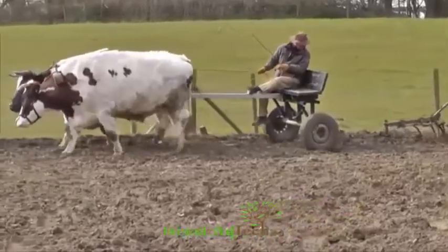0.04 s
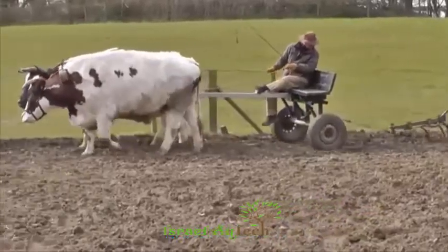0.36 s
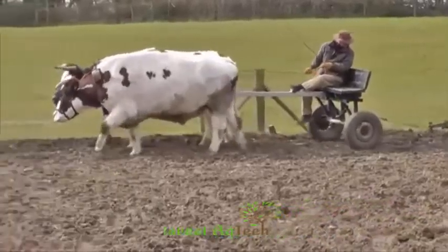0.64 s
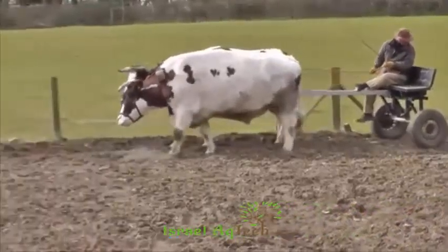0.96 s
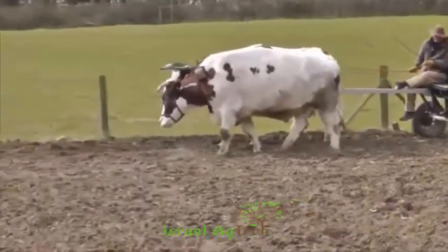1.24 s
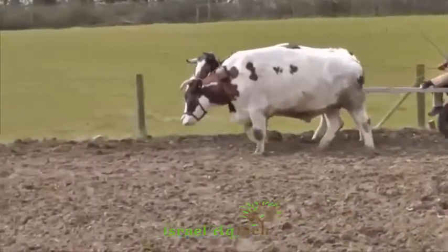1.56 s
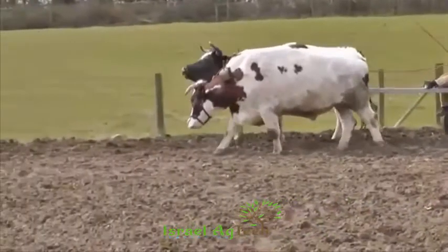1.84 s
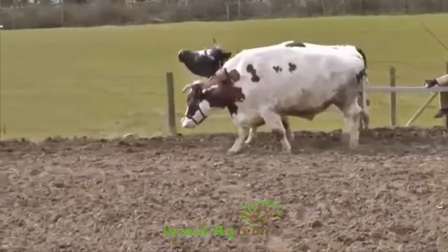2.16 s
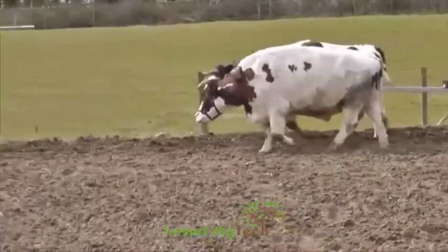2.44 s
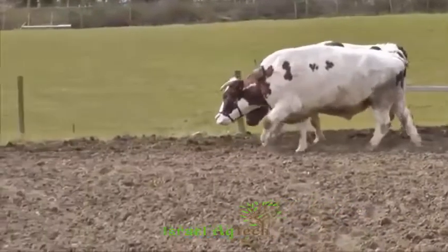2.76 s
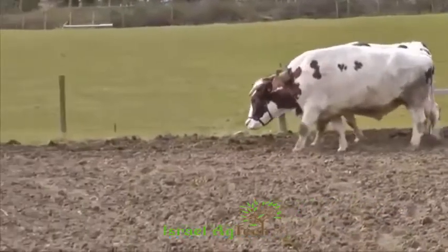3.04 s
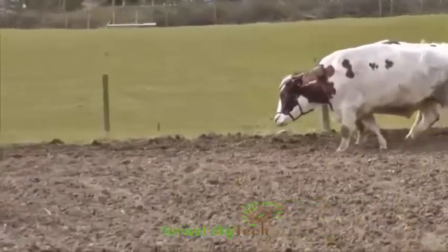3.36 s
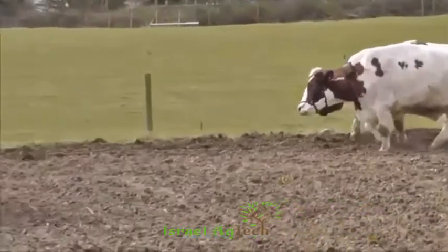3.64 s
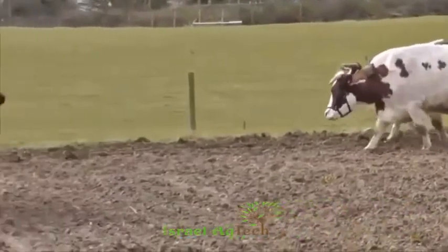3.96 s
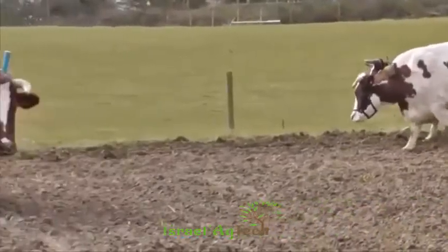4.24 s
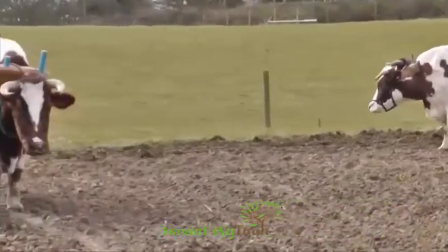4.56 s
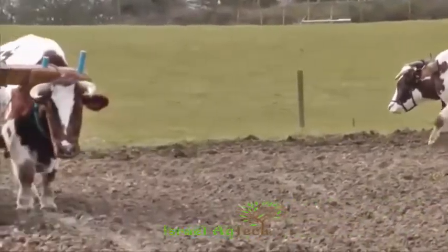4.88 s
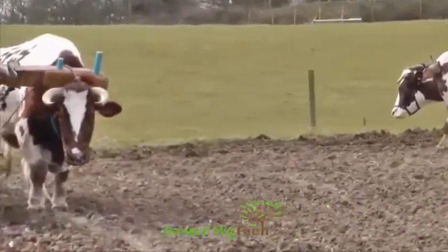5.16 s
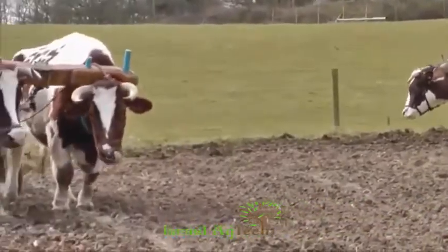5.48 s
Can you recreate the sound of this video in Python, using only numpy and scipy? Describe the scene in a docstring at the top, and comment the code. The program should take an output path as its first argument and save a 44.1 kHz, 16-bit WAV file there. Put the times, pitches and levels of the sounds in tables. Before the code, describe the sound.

Bright, irregular chain clinks and a few sharp hitch knocks come from the left of a nearby stereo microphone as a team of oxen hauls a cart across a field. Softer gritty scrapes and hissing sprays of dry earth follow their strides. The breeze is light at first, then turns halfway into loud, low gusts, mostly on the right, that slap and distort over the continuing ironwork.

```python
"""A breezy open field, close beside a yoked pair of oxen dragging a cart and harrow over loose soil.
Left of the stereo microphone the draught chain clinks and rattles with their stride, link ringing on
link, and the hitch knocks. Hooves and tines scrape the earth, crush clods and fling dry crumbs.
Halfway through, gusts start to buffet the two microphone ports, thumping, crackling and overloading them."""
import sys
import numpy as np
from scipy import signal
from scipy.fft import rfft, irfft, next_fast_len
from scipy.io import wavfile
from scipy.ndimage import uniform_filter1d

SR = 44100
rng = np.random.default_rng(int(sys.argv[2]) if len(sys.argv) > 2 else 0)


def wav_out(sig):
    """Save sig, one row per channel (or a flat mono array), as 16-bit PCM at SR to the path in sys.argv[1]."""
    wavfile.write(sys.argv[1], SR, np.round(np.clip(np.atleast_2d(sig).T, -1, 1) * 32767).astype(np.int16))


N = 243025
TIME = np.arange(N) / SR

# Levels in the tables are relative: each source adds its own gain. A t60 is the time to die by 60 dB.
# The clearest blows between links. Each row: start in seconds, level in dB, pitch in Hz,
# trims of the second and third modes in dB, t60 in seconds.
LINK_BLOWS = [(0.0498, -24, 2140, -1, -23, 0.14), (0.1281, -16, 2112, -11, -17, 0.11),
              (0.176, -18, 2126, -30, -21, 0.043), (0.2443, -15.5, 2113, -3, -19, 0.12),
              (0.363, -14.5, 2095, -9, -42, 0.045), (0.5467, -10.5, 2084, -21, -26, 0.059),
              (0.6399, -8.5, 2098, -12.5, -26, 0.12), (0.7257, -19.5, 2070, -19, -8, 0.06),
              (1.0026, -21.5, 2135, -31, -15, 0.24), (1.174, -12, 2100, -2.5, -32, 0.15),
              (1.29, -23, 2100, -8, -16, 0.077), (1.4222, -8.5, 2107, -9, -21, 0.1),
              (1.4642, -16.5, 2090, -11, -33, 0.097), (1.5783, -26, 2070, -12, -8, 0.087),
              (1.6621, -15.5, 2083, -4, -20, 0.1), (1.704, -17.5, 2095, -14, -17, 0.1),
              (1.8457, -23, 2128, -6, -9, 0.34), (2.0243, -24.5, 2130, -26, -10, 0.052),
              (2.0577, -27, 2100, -20, -20, 0.13), (2.1625, -20.5, 2090, -12, -25, 0.18),
              (2.2643, -18, 2086, -6, -18, 0.16), (2.3156, -18, 2095, 0, -33, 0.14),
              (2.363, -21, 2056, 1.5, -20, 0.069), (2.4454, -16.5, 1986, 1, -5, 0.048),
              (2.4538, -7, 2071, -36, -12.5, 0.15), (2.588, -25.5, 2090, -14, -6, 0.26),
              (2.6695, -16.5, 2090, -4.5, -23, 0.06), (2.7487, -14.5, 2080, -16, -12, 0.047),
              (2.8933, -12.5, 2115, -13, -22, 0.1), (2.9124, -12.5, 2110, -12, -30, 0.15),
              (3.0679, -15, 2090, -2, -30, 0.17), (3.1913, -7.5, 2092, -2, -23, 0.064),
              (3.2645, -19, 2083, -4, -21, 0.11), (3.3323, -23.5, 2116, -11, -12, 0.13),
              (3.4101, -15, 2085, -7, -17, 0.081), (3.484, -21, 2137, -4, -12, 0.11),
              (3.5502, -6.5, 2093, -18, -42, 0.11), (3.6195, -8.5, 2090, -10, -20, 0.13),
              (3.7739, -7.5, 2094, -2.5, -21, 0.14), (3.927, -21, 2080, -24, -20, 0.14),
              (4.0966, -20, 2126, -20, -10.5, 0.25), (4.2552, -25.5, 2110, -11, -9, 0.18),
              (4.4174, -10.5, 2097, -38, -19.5, 0.089), (4.4737, -22, 2106, -13, -16, 0.29),
              (4.5271, -19, 2133, -27, -25, 0.082), (4.6448, -23.5, 2137, -18, -29, 0.11),
              (4.7382, -16.5, 2106, -48, -17, 0.12), (4.8299, -19.5, 2116, -30, -19, 0.087),
              (4.9655, -11.5, 2090, -10, -37, 0.079), (5.156, -17.5, 2132, -31, -42, 0.21),
              (5.2599, -28, 2120, -14, -22, 0.094), (5.384, -25, 2080, 13.5, -28, 0.13),
              (5.4415, -13.5, 2104, -32, -45, 0.26), (5.4809, -9.5, 2104, -5.5, -42, 0.12)]
# High pings of the chain, some alone, some ringing with a louder clink.
# Each row: start in seconds, level in dB, pitch in Hz, t60 in seconds.
CHAIN_PINGS = [(0.1125, -25, 8690, 0.28), (0.2344, -33.5, 9420, 0.28), (0.265, -29, 4750, 0.21),
               (0.365, -28.5, 7515, 0.12), (0.548, -31, 7515, 0.093), (0.7065, -18.5, 4740, 0.1),
               (0.759, -17, 4840, 0.11), (0.796, -8, 4780, 0.033), (1.2144, -28, 4760, 0.2),
               (1.4845, -28, 8640, 0.24), (1.721, -24, 4840, 0.17), (1.735, -20, 4760, 0.11),
               (2.417, -27.5, 8570, 0.35), (2.737, -22.5, 4785, 0.4), (2.765, -21, 4800, 0.092),
               (3.57, -37, 9410, 0.35), (3.5992, -19.5, 4830, 0.18), (3.652, -26, 4830, 0.46),
               (4.419, -25, 8700, 0.062), (4.5292, -15, 4820, 0.063), (4.6735, -27, 4840, 0.057),
               (4.696, -26.5, 4830, 0.12), (4.8733, -26, 4800, 0.067), (4.8835, -20.5, 4780, 0.069),
               (5.31, -28, 10160, 0.16)]
# Knocks of the hitch iron. Each row: start in seconds, level in dB.
HITCH_KNOCKS = [(0.124, -9), (1.385, -11.5), (1.404, -6), (1.4132, 5.5), (1.4213, -4), (1.485, -13),
                (1.4936, -12.5), (1.998, -15), (2.2114, -10.5), (2.678, -9), (3.0736, -5), (4.304, -13),
                (5.309, -13.5)]
# Short shakes of the slack chain. Each row: start in seconds, level in dB.
CHAIN_SHAKES = [(0.0, -33.5), (0.119, -32.5), (0.228, -34.5), (1.211, -32), (1.649, -32), (2.11, -38),
                (2.38, -53), (2.6, -30.5), (2.86, -29), (3.76, -33.5), (4.099, -31), (4.48, -43),
                (4.96, -37), (5.199, -36.5)]
# How the iron rings. Each row: frequency in Hz, level in dB, t60 in seconds.
LINK_MODES = [(2101, 0, .16), (3940, 0, .17), (5190, 0, .15), (4770, -27, .15), (7515, -29, .2),
              (8610, -29, .22), (9410, -25, .14), (10280, -30, .12)]  # the three main modes first
SMALL_LINK_MODES = [(3945, -13, .2), (4780, -8, .2), (5340, -14, .15), (7900, -16, .2), (8740, -16, .2),
                    (9410, -8.5, .18), (10270, -10, .18)]
HITCH_MODES = [(1563, -18.5, 0.053), (1664, -8, 0.022), (1680, -13, 0.048), (4500, -27, 0.023)]

# The team's steady pull. Each row: time in seconds, chain sliding in dB, soil scraping in dB.
TEAM_PULL = [(0, -46, -33.5), (0.55, -58, -41.5), (1.1, -50, -36), (1.55, -51, -32.5), (1.85, -45, -37),
             (2.2, -51, -35.5), (2.5, -46, -35), (3.4, -42, -35), (4.0, -41.5, -31.5), (4.4, -56, -35),
             (4.9, -44, -36), (5.5, -44.5, -33.5)]
# Strides jerking the harrow on. Each row: crest in seconds, then chain, soil and clod levels in dB.
STRIDE_JERKS = [(0.788, -28, -26.5, -23.5), (1.748, -28.5, -29, -24), (2.781, -32, -27, -41),
                (3.621, -29.5, -27, -42), (4.54, -40, -44, -26), (5.331, -33.5, -43, -27)]
# Hooves scuffing the ground. Each row: start and length in seconds, then soil and clod levels in dB.
HOOF_SCUFFS = [(0.116, 0.02, -28, -27.5), (0.263, 0.031, -36, -38), (0.485, 0.11, -45, -34.5),
               (0.877, 0.015, -28.5, -52), (0.973, 0.046, -33, -40), (1.184, 0.12, -30.5, -30.5),
               (1.53, 0.063, -50, -30), (2.138, 0.018, -29, -43), (2.383, 0.054, -40, -53),
               (2.6, 0.15, -44, -32), (3.05, 0.071, -30.5, -24.5), (3.407, .04, -46, -43),
               (4.531, 0.018, -34, -35), (4.939, 0.072, -33.5, -31), (5.13, 0.13, -31.5, -52),
               (5.349, 0.12, -34.5, -27.5)]
# Crumbs flung by hooves. Each row: start and length in seconds, level in dB, attack in seconds, peak in Hz.
CRUMB_THROWS = [(0.107, 0.025, -53, .01, 7500), (0.742, 0.025, -28, .03, 6300),
                (1.67, .008, -32, .004, 6000), (1.72, 0.047, -30.5, .02, 7300),
                (1.787, 0.51, -40.5, .03, 6900), (1.9, 0.012, -31, .008, 6700),
                (2.145, 0.011, -38, .004, 6000), (2.377, 0.015, -30, .004, 6700),
                (2.603, .025, -29, .012, 6900), (2.83, 0.028, -29.5, .025, 6500),
                (3.07, 0.053, -33, 0.036, 6940), (3.316, 0.014, -29.5, .004, 7300),
                (3.773, 0.014, -29.5, .012, 7050), (4.021, .004, -29, .002, 6430),
                (4.04, 0.067, -35, .03, 7000), (4.24, 0.027, -33, .018, 7200),
                (4.484, 0.014, -28.5, .005, 7000), (4.717, 0.014, -28.5, .007, 7200),
                (4.95, 0.05, -37.5, .01, 6350), (4.945, 0.35, -37.5, .05, 3440),
                (5.173, 0.03, -32.5, .02, 6840)]
# The hiss of those crumbs. Each row: multiple of the peak frequency, spectral level in dB.
SPRAY_SPECTRUM = [(.24, -27), (.55, -20), (.82, 5), (1, 5), (1.27, 1.5), (1.67, -2)]

# The breeze on the microphone. Each row: time in seconds, level in dB, left minus right in dB.
BREEZE_CURVE = [(0, -26, -3.5), (0.7, -45, -5), (1.1, -29, -1), (1.6, -40.5, -1), (1.85, -27, -4),
                (2.3, -25, 1), (2.6, -13.5, -5.5), (2.95, -9.5, -7), (3.32, -14.5, -5.5), (3.65, -10, -5.5),
                (4.0, -7, -0.5), (4.3, -12, -2.5), (4.6, -14.5, -10), (4.87, -21, -5), (5.05, -15, -5),
                (5.5, -11.5, -15)]
# Gusts, most from the right. Each row: start and length in seconds, level in dB, left minus right in dB.
WIND_GUSTS = [(0.118, 0.041, -31, -16), (0.414, 0.13, -28.5, -6), (0.902, 0.14, -25, -24),
              (1.894, 0.084, -22, -14), (2.263, 0.036, -19, -8), (2.387, 0.03, -17, -12),
              (2.44, 0.06, -17.5, 6), (2.574, 0.076, -9, -14.5), (2.696, 0.19, -1, -26),
              (2.852, 0.023, -2.5, 7), (3.382, 0.093, -3, -9.5), (3.487, 0.036, -6.5, 17),
              (3.641, 0.28, -5.5, -6.5), (4.393, 0.12, -10.5, -6), (4.905, 0.072, -10, -14.5),
              (5.308, 0.048, -8, -4), (5.449, 0.016, -7, -12)]
# Sharp slaps of wind. Each row: start in seconds, level in dB, left minus right in dB, length in seconds.
WIND_SLAPS = [(0.997, -13, -18, 0.011), (2.708, 3, -8, 0.029), (2.773, 3.5, -20, 0.026),
              (2.827, 4.5, -36, 0.028), (3.07, -1, 17.5, 0.027), (3.43, 4, -10, 0.023),
              (3.825, 5.5, 5, 0.027), (4.964, 4.5, -1.5, 0.013), (5.255, -3.5, -14.5, 0.021),
              (5.342, -1.5, -40, 0.0046)]
# Lone eddies on the right port. Each row: centre in seconds, level in dB, pitch in Hz.
EDDY_THUMPS = [(1.001, -5.5, 304), (1.016, -12, 260), (2.267, -8, 263), (2.404, -8, 149), (3.189, 3.5, 320),
               (3.401, -2, 285), (4.229, 3.5, 168), (4.2427, 3, 583), (4.284, -1, 196), (4.34, -3, 152),
               (4.374, -1.5, 386), (4.412, 2, 195), (4.474, -2, 400), (4.624, -6, 201), (4.717, -5.5, 234),
               (4.974, 4.5, 206), (5.127, 1, 129), (5.35, -7, 466)]
# A faint low drone in the background. Each row: time in seconds, level in dB.
DRONE_CURVE = [(0, -67), (.5, -43), (.7, -26), (1.3, -36.5), (1.65, -31), (1.8, -24.5), (2.5, -25),
               (3.5, -73), (5.5, -53)]

# The colours of the noises. Each row: frequency in Hz, spectral level in dB.
CLACK_SPECTRUM = [(1000, -42), (1750, -5), (1950, 34), (2250, -5), (2500, -35), (4000, -41), (10000, -40)]  # link meeting link
FIZZ_SPECTRUM = [(1000, -27), (3300, -17), (4200, 18), (4800, 15), (5500, 15), (6400, -41), (7700, 4),
                 (9400, 13.5), (10800, 2)]  # rubbing iron
SOIL_SPECTRUM = [(150, 9), (400, -3), (700, 7.5), (1150, 0.5), (1750, 9), (2300, -2.5), (3000, -6.5),
                 (3700, 1), (4800, -3.5), (6300, -21.5), (8000, -7.5), (10500, -16.5)]  # scraped earth
CLOD_SPECTRUM = [(150, -10), (460, -6), (660, 3.5), (900, 6.5), (1250, -4.5), (1900, -2), (2800, -5.5),
                 (5000, -82)]  # lumps giving way
BUFFET_SPECTRUM = [(20, -48), (50, -1.5), (110, 4), (210, 3), (330, -1.5), (500, -12), (900, -21.5),
                   (1800, -34), (4000, -95), (9000, -87)]  # a strong gust on a port
SLAP_SPECTRUM = [(40, -89), (150, 9.5), (350, 2), (700, -4), (1500, -38), (3000, -36), (9000, -82)]  # one fast eddy bursting
CRACKLE_SPECTRUM = [(200, 8), (450, 1.5), (800, -2), (1400, -12.5), (2600, -30)]  # small eddies breaking
FIELD_SPECTRUM = [(20, -26), (50, -5), (100, 5), (240, 10.5), (420, 9), (680, 1), (1200, -16), (1750, 6),
                  (2200, -8), (2900, -71), (4300, -26), (6300, -64), (10500, -43)]  # open country


def clinks(level_db=1.0, neighbour_db=-9.0, clack_db=-12.5, bounce_db=-16.5, rise_s=0.0025, clack_s=0.0089):
    """Each blow clacks, rings a link and its damped neighbour, and passes to the next link a moment later."""
    out, t = np.zeros((2, N)), np.arange(SR // 5) / SR
    chances, strikes = rng.random((128, 4)), rng.standard_normal((128, 2, len(LINK_MODES) - 1))
    for (s, db, pitch, second_db, third_db, t60), chance, strike in zip(LINK_BLOWS, chances, strikes):
        neighbour_tune, delay, bounce_tune, graze = chance
        spot, detunes = strike
        contact_s = rise_s * gain_of(-db / 10)  # light, glancing blows build up more slowly
        link = ring(pitch, t60, left_db=11, rise_s=contact_s)
        neighbour = ring(pitch * (.98 + .025 * neighbour_tune), t60=0.023, left_db=11, rise_s=contact_s)
        blow = (link + gain_of(neighbour_db) * neighbour) * chatter(depth=.5 * graze)
        clack = coloured(rng.standard_normal(len(t)), CLACK_SPECTRUM)
        clack *= np.exp(-t / clack_s) * (1 - np.exp(-t / rise_s))
        blow += gain_of(clack_db) * clack * pan(left_db=9)
        # where the link is struck decides how strongly each overtone speaks
        struck_db = np.r_[second_db - 7, third_db + 1.5, 5 * spot[2:] - 6.5]
        for (hz, mode_db, mode_t60), extra_db, detune in zip(LINK_MODES[1:], struck_db, detunes):
            overtone = ring(hz * (1 + 0.0027 * detune), mode_t60, left_db=6, rise_s=0.0074)
            blow += gain_of(mode_db + extra_db) * overtone
        add(out, s, gain_of(db + level_db) * blow)
        bounce = ring(pitch * (.99 + .02 * bounce_tune), t60=.12, left_db=10, rise_s=.002)
        add(out, s + .012 + 0.046 * delay, gain_of(db + bounce_db) * bounce)
    return out


def pings(level_db=-2.0, twin_db=-21.5):
    """One high mode of a link rings, alone or with a louder clink, and briefly that of the link it meets."""
    out = np.zeros((2, N))
    for (s, db, hz, t60), detune in zip(CHAIN_PINGS, rng.uniform(-.025, .025, 64)):
        link = ring(hz, t60, left_db=9.5, rise_s=0.003)
        twin = gain_of(twin_db) * ring(hz * (1 + detune), t60=0.06, left_db=-1, rise_s=0.001)
        add(out, s, gain_of(db + level_db) * chatter(depth=.55) * (link + twin))
    return out


def clanks(level_db=2.0, crack_db=-24.0, crack_s=0.014):
    """Well to the left, the hitch takes up its slack in knocks, each a crack and a short ring."""
    out, t = np.zeros((2, N)), np.arange(SR // 5) / SR
    body = sum(gain_of(db) * ring(hz, t60, left_db=21, rise_s=0.0024) for hz, db, t60 in HITCH_MODES)
    for s, db in HITCH_KNOCKS:
        crack = coloured(rng.standard_normal((2, len(t))), SOIL_SPECTRUM) * np.exp(-t / crack_s)
        add(out, s, gain_of(db + level_db) * (body + gain_of(crack_db) * crack * pan(left_db=6)))
    return out


def rattle(slide, links_db=-2.0, fizz_db=1.0):
    """The sliding chain rubs with a fine fizz, and ticks against itself and the hitch."""
    jingle = jostle(SMALL_LINK_MODES, slide, per_s=70, left_db=5, apart=.009)
    links = jostle(LINK_MODES[:1], slide, per_s=40, left_db=10, apart=.02)
    hitch = jostle(HITCH_MODES[:3], slide, per_s=30, left_db=11, apart=.02)
    friction = stereo_grains(per_s=4100, spread_db=-4.5, shared=0.16)
    fizz = patchy(coloured(friction, FIZZ_SPECTRUM), depth_db=6)
    return jingle + gain_of(links_db) * links + hitch + gain_of(fizz_db) * slide * fizz


def jostle(modes, slide, per_s, left_db, apart, t60_scale=0.57):
    """Many small random blows ring the modes of three nearly equal parts, which damp each other."""
    out = np.zeros((2, N))
    for hz, db, t60 in modes:
        for detune in (-apart, 0, apart):
            mode = ring(hz * (1 + detune), t60 * t60_scale, left_db, rise_s=0.00083)
            mode /= np.linalg.norm(mode[0])
            blows = evened(grains(per_s, spread_db=5)) * slide
            out += gain_of(db) * signal.oaconvolve(blows[None], mode, axes=1)[:, :N]
    return out


def ring(hz, t60, left_db, rise_s):
    """One dying mode of iron as both ports hear it; it reaches the right one first."""
    t = np.arange(SR // 5) / SR
    envelope = gain_of(-60 * t / t60) * (1 - np.exp(-t / rise_s))
    phase = 2 * np.pi * hz * t
    return envelope * np.array([np.sin(phase - .8), np.sin(phase)]) * pan(left_db)


def chatter(depth):
    """The quick, uneven flutter of a ringing link that grazes its neighbour."""
    return 1 + depth * evened(uniform_filter1d(rng.standard_normal(SR // 5), size=130))


def efforts(flutter_db=-5.0, wheels_db=-45.5, build_s=0.064, slack_s=0.036):
    """How hard chain, soil and clods are worked: pull, strides, hooves and shakes add up as powers."""
    chain, soil = gain_of(follow(TEAM_PULL)) ** 2
    chain *= gain_of(flutter_db * wander(rate_hz=3.7)) ** 2
    lumps = np.full(N, gain_of(wheels_db) ** 2)  # the wheels crumble clods all the time
    for s, chain_db, soil_db, clods_db in STRIDE_JERKS:
        jerk = np.exp(-np.maximum((s - TIME) / build_s, (TIME - s) / slack_s))
        chain += (gain_of(chain_db) * jerk) ** 2
        soil += (gain_of(soil_db) * jerk) ** 2
        lumps += (gain_of(clods_db) * jerk) ** 2
    for s, length, soil_db, clods_db in HOOF_SCUFFS:
        scuff = swell(s, length, attack_s=0.01, release_s=0.013)
        soil += (gain_of(soil_db) * scuff) ** 2
        lumps += (gain_of(clods_db) * scuff) ** 2
    for s, db in CHAIN_SHAKES:
        chain += (gain_of(db) * swell(s, length_s=0.0042, attack_s=0.0013, release_s=0.027)) ** 2
    return np.sqrt([chain, soil, lumps])


def scrape(rub, level_db=5.5, flutter_db=2.5):
    """Fine soil rubs under hooves and tines, a little left of centre."""
    level = gain_of(level_db + flutter_db * wander(rate_hz=10.4))
    grit = coloured(stereo_grains(per_s=2600, spread_db=1.5, shared=0.53), SOIL_SPECTRUM)
    return patchy(grit, depth_db=9) * rub * level * pan(left_db=3)


def sprays(flutter_db=-1.5):
    """Dry crumbs thrown up by the hooves patter down unevenly; the finer they are, the brighter they hiss."""
    out = np.zeros((2, N))
    patter = stereo_grains(per_s=8000, spread_db=-2.5, shared=0.49)
    patter *= gain_of(flutter_db * wander(rate_hz=46))
    for s, length, db, attack_s, peak_hz in CRUMB_THROWS:
        part = slice(round(s * SR), round((s + length + .25) * SR))
        spectrum = [(peak_hz * multiple, band_db) for multiple, band_db in SPRAY_SPECTRUM]
        hiss = coloured(patter[:, part], spectrum)
        release_s = 0.03 * (length / .02) ** 0.15  # a longer throw settles more slowly
        out[:, part] += gain_of(db) * hiss * swell(s, length, attack_s, release_s)[part]
    return out * pan(left_db=-1)


def clods(crush, level_db=-1.0):
    """Larger lumps of earth give way with duller, coarser knocks."""
    crunch = coloured(stereo_grains(per_s=600, spread_db=0, shared=0.77), CLOD_SPECTRUM)
    return patchy(crunch, depth_db=4.5) * crush * gain_of(level_db) * pan(left_db=-1.5)


def wind(level_db=-0.92, brighten_per_db=0.014, lumps_db=3.0, pop_gain=0.76):
    """Eddies hit each microphone port separately; faster air makes smaller eddies and a higher rumble."""
    strength = airflow()
    air = rng.standard_normal((2, N))  # smooth turbulence, then single pops of pressure
    air += pop_gain * np.array([evened(grains(per_s=74, spread_db=6)) for side in range(2)])
    hz, frame_s, spectra = signal.stft(air, SR, nperseg=1024)
    strength_db = 20 * np.log10([np.interp(frame_s, TIME, port) for port in strength])
    pitch = np.exp(brighten_per_db * (strength_db + 14))
    pitch *= [[1.32], [0.87]]  # the sheltered left port gets smaller eddies
    shape = gain_of(level_at(BUFFET_SPECTRUM, hz[None, :, None] / pitch[:, None]))
    shape /= np.linalg.norm(shape, axis=1, keepdims=True)
    eddies = evened(signal.istft(spectra * shape, nperseg=1024)[1][:, :N])
    # the gust sets the force, the eddies only add quick lumps
    eddies /= np.sqrt(uniform_filter1d(eddies ** 2, size=2500, axis=1) + 1e-6)
    lumps = gain_of(lumps_db * np.array([wander(rate_hz=24.4), wander(rate_hz=26)]))
    return gain_of(level_db) * strength * eddies * lumps + crackle(strength)


def airflow(unsteady_db=-0.96):
    """Force of the air on each port: an unsteady breeze that freshens halfway, with gusts on top."""
    def port_powers(db, left_db):
        """Splits a power between the two ports."""
        sides = gain_of([left_db, -left_db]).reshape(2, -1)
        return gain_of(db) ** 2 * sides / sides.mean(0)
    unsteady = gain_of(unsteady_db * np.array([wander(rate_hz=6.3) for side in range(2)]))
    power = port_powers(*follow(BREEZE_CURVE)) * unsteady ** 2
    for s, length, db, left_db in WIND_GUSTS:
        power += port_powers(db, left_db) * swell(s, length, attack_s=0.016, release_s=0.019) ** 2
    return np.sqrt(power)


def crackle(strength, level_db=-15.0, left_db=6.0, growth=1.79):
    """Small eddies break on each port in coarse pops, growing faster than the gust, up to a ceiling."""
    pops = coloured(np.array([grains(per_s=98, spread_db=1.5) for side in range(2)]), CRACKLE_SPECTRUM)
    return pops * np.minimum(strength, .5) ** growth * gain_of([[level_db + left_db], [level_db]])


def slaps(level_db=-9.5):
    """Now and then one fast eddy bursts right on the microphone."""
    out, t = np.zeros((2, N)), np.arange(SR // 8) / SR
    for s, db, left_db, length in WIND_SLAPS:
        age = 3 * t / length  # the burst crests a third of the way in
        burst = coloured(rng.standard_normal((2, len(t))), SLAP_SPECTRUM) * age * np.exp(1 - age)
        add(out, s, gain_of(db + level_db) * burst * pan(left_db))
    return out


def thumps(width_cycles=0.58):
    """A lone eddy swings the pressure on the windward right port once, with a dull thump."""
    out, t = np.zeros((2, N)), np.arange(-SR // 50, SR // 50) / SR
    for (s, db, hz), phase in zip(EDDY_THUMPS, rng.uniform(0, 2 * np.pi, 64)):
        swing = np.cos(2 * np.pi * hz * t + phase) * np.exp(-(hz * t / width_cycles) ** 2 / 2)
        add(out, s + t[0], gain_of(db) * np.outer([0, 1], swing))
    return out


def scatter(x, wet_db=-13.0, t60=.22, echoes_per_s=2000):
    """Rough ground and the cart nearby throw back a short, thin tail behind the direct sound."""
    t = np.arange(SR // 2) / SR
    taps = rng.standard_normal((2, len(t))) * (rng.random((2, len(t))) < echoes_per_s / SR)
    taps *= (t > .004) * gain_of(-60 * t / t60)
    taps /= np.linalg.norm(taps, axis=1, keepdims=True)
    return x + gain_of(wet_db) * signal.oaconvolve(x.mean(0)[None], taps, axes=1)[:, :N]


def field(wash_db=-34.5, drone_db=-7.5, drone_hz=49.5):
    """Behind it all lies the steady wash of open country, with a low wavering drone."""
    air = rng.standard_normal((2, N)) + 0.86 * rng.standard_normal(N)  # partly common to both ports
    phase = 2 * np.pi * np.cumsum(drone_hz * (1 + 0.035 * wander(rate_hz=1.3))) / SR
    drone = evened(np.sin(phase) + 0.32 * np.sin(2 * phase)) * gain_of(follow(DRONE_CURVE)[0] + drone_db)
    return gain_of(wash_db) * coloured(air, FIELD_SPECTRUM) + drone


def grains(per_s, spread_db):
    """A train of random clicks; a few stand out if spread_db is positive, or sink if it is negative."""
    draw, train = rng.uniform(-1, 1, N) * SR / per_s, np.zeros(N)
    hit = abs(draw) < 1
    rarity = np.minimum(-np.log(abs(draw[hit]) + 1e-9), 4)
    train[hit] = np.sign(draw[hit]) * gain_of(spread_db * rarity)
    return train


def stereo_grains(per_s, spread_db, shared, lag_samples=7):
    """Clicks of grit or iron; a share of their power reaches both ports, the left one slightly later."""
    common, left, right = (evened(grains(per_s, spread_db)) for train in range(3))
    late = np.interp(TIME - lag_samples / SR, TIME, common)
    return np.sqrt(shared) * np.array([late, common]) + np.sqrt(1 - shared) * np.array([left, right])


def patchy(x, depth_db):
    """Lets random patches of the spectrum, some 400 Hz by 25 ms, thin out or swell a little."""
    spectra = signal.stft(x, SR, nperseg=512)[2]
    patches = uniform_filter1d(rng.standard_normal(spectra.shape[1:]), size=5, axis=0)
    patches = evened(uniform_filter1d(patches, size=4, axis=1))
    spectra *= gain_of(depth_db * np.minimum(patches, .7))
    return evened(signal.istft(spectra, SR, nperseg=512)[1][:, :N])


def coloured(x, spectrum):
    """Filters a signal by a spectrum, to an rms of one."""
    size = next_fast_len(x.shape[-1], True)
    gains = gain_of(level_at(spectrum, np.fft.rfftfreq(size, 1 / SR)))
    return evened(irfft(rfft(x, size) * gains, size)[..., :x.shape[-1]])


def level_at(spectrum, hz):
    """Reads a spectrum's dB on a log-frequency axis."""
    points_hz, db = np.transpose(spectrum)
    return np.interp(np.log(hz + 1), np.log(points_hz + 1), db)


def wander(rate_hz, steps=4096, steps_per_s=512):
    """A random drift, mostly slower than rate_hz, at an rms of one."""
    hz = np.fft.rfftfreq(steps, 1 / steps_per_s)
    slow = irfft(rfft(rng.standard_normal(steps)) / (1 + (hz / rate_hz) ** 4))
    return evened(np.interp(TIME, np.arange(steps) / steps_per_s, slow))


def swell(start_s, length_s, attack_s, release_s):
    """An envelope that rises from its start and dies away once its length has passed."""
    rise = np.clip((TIME - start_s) / attack_s, 0, 1)
    return rise * np.exp(-np.clip((TIME - start_s - length_s) / release_s, 0, 30))


def follow(curve):
    """The columns of a timed curve at every sample."""
    s, *columns = np.transpose(curve)
    return [np.interp(TIME, s, column) for column in columns]


def pan(left_db):
    """Gains for the two ports, the left one left_db above the right."""
    return gain_of([[left_db / 2], [-left_db / 2]])


def add(mix, s, sound):
    """Mixes a stereo sound in at s seconds."""
    part = mix[:, max(round(s * SR), 0):][:, :sound.shape[1]]
    part += sound[:, :part.shape[1]]


def gain_of(db):
    """Decibels to amplitude."""
    return 10 ** (np.asarray(db) / 20)


def evened(x):
    """Scales to an rms of one."""
    return x / np.sqrt(np.mean(x ** 2) + 1e-20)


def below(x, hz):
    """A steep low-pass."""
    return signal.oaconvolve(x, signal.firwin(401, hz, window=("kaiser", 7), fs=SR)[None], "same", axes=1)


def scene():
    """Ironwork and earth close by, the field beyond, and wind on the microphone itself."""
    slide, rub, crush = efforts()
    iron = scatter(clinks() + pings() + clanks() + rattle(slide))
    earth = scrape(rub) + sprays() + clods(crush)
    return iron + earth + field() + wind() + slaps() + thumps()


def record(dry, hardness=4.4, makeup_db=0.23, band_hz=10900, top_hz=17000):
    """Strong gusts and knocks overload the microphone; band-limited, their crests clip again and crackle."""
    saturated = dry / (1 + abs(dry) ** hardness) ** (1 / hardness)
    clipped = np.clip(gain_of(makeup_db) * below(saturated, band_hz), -1, 1)
    return below(clipped, top_hz)


dry = scene()
out = record(dry)
wav_out(out)
```